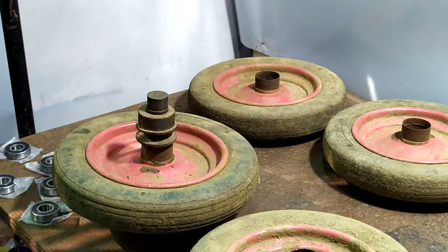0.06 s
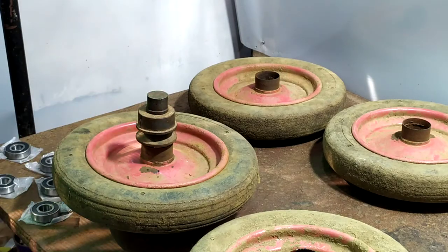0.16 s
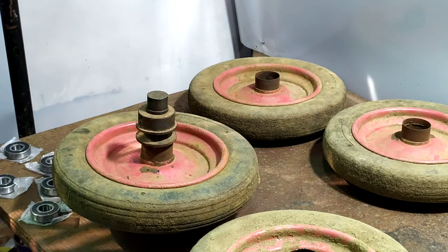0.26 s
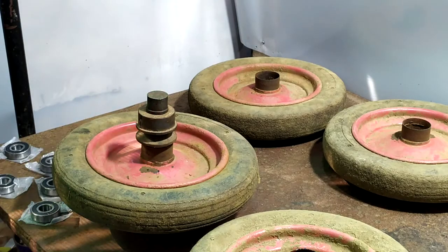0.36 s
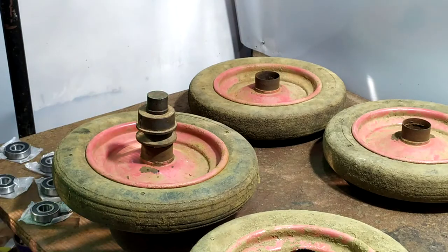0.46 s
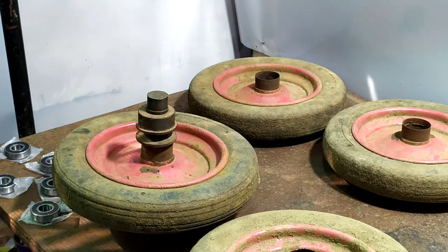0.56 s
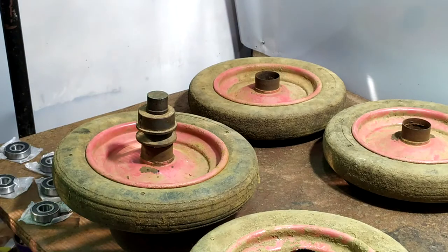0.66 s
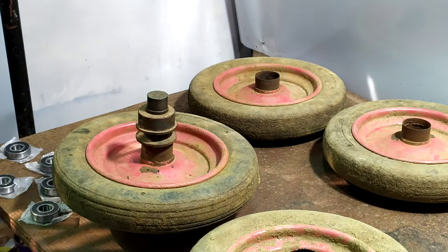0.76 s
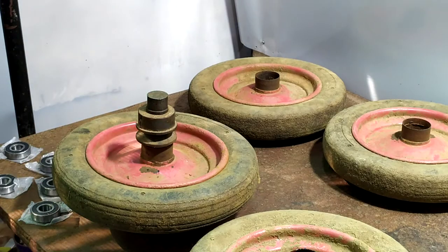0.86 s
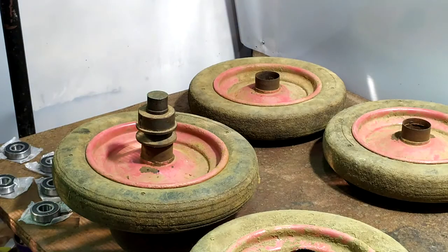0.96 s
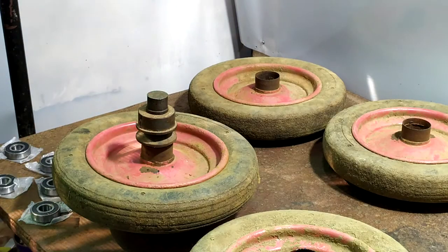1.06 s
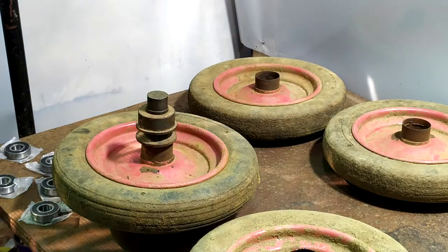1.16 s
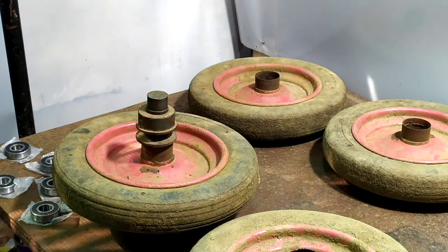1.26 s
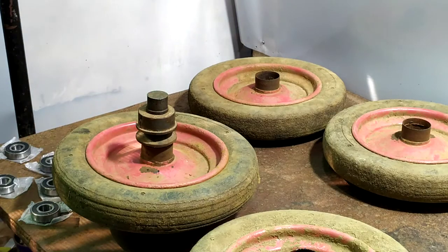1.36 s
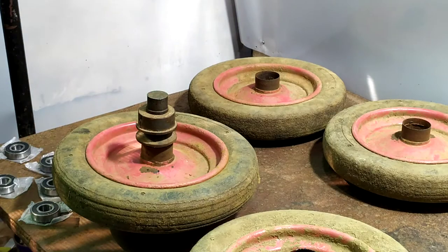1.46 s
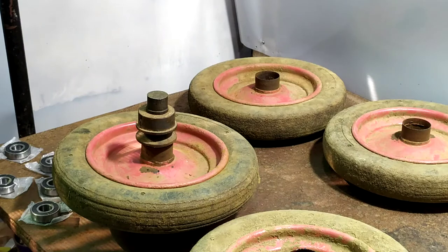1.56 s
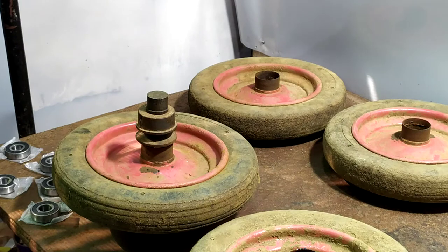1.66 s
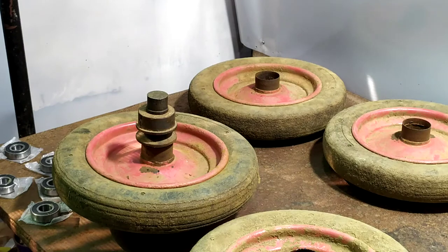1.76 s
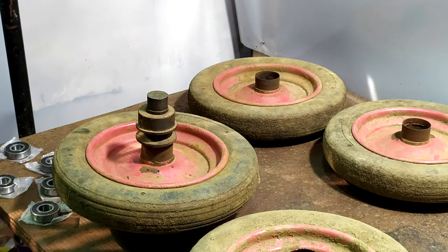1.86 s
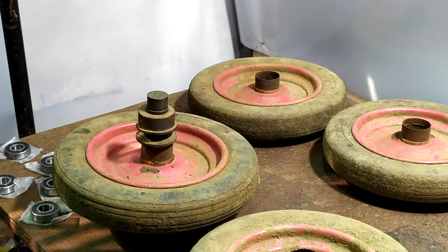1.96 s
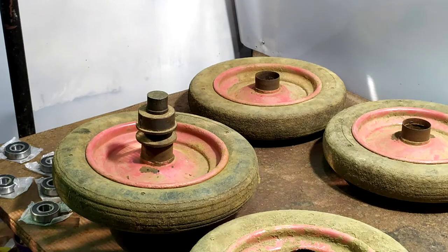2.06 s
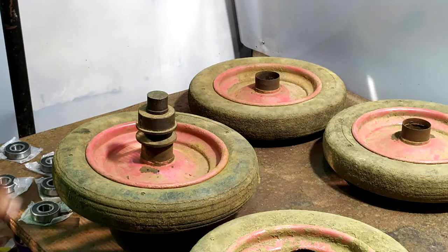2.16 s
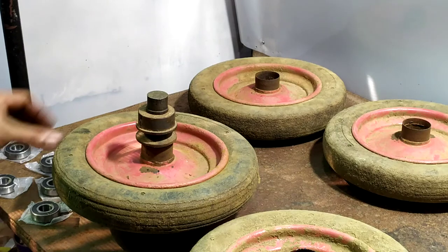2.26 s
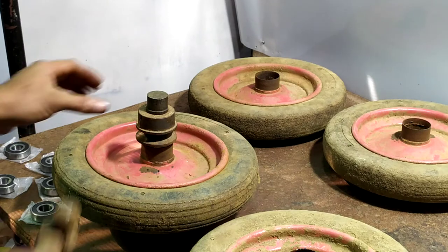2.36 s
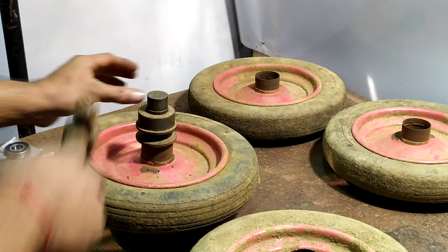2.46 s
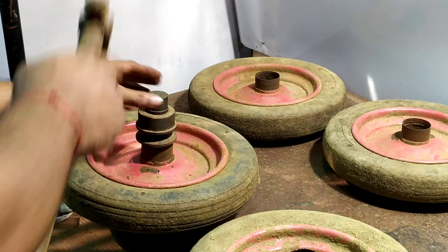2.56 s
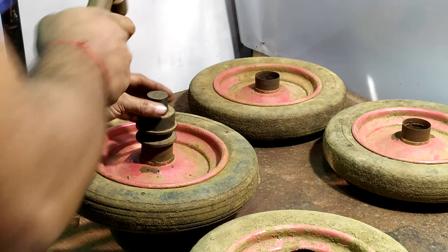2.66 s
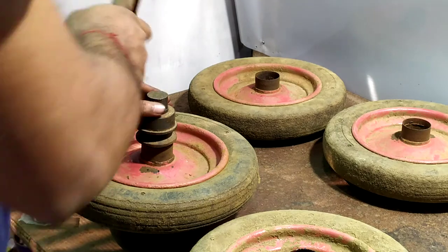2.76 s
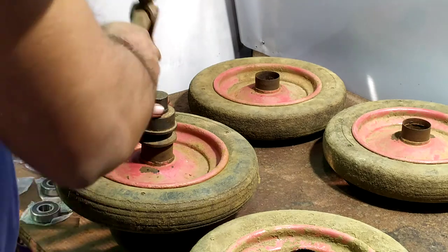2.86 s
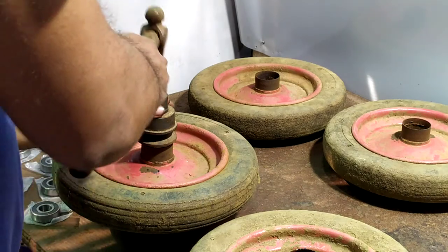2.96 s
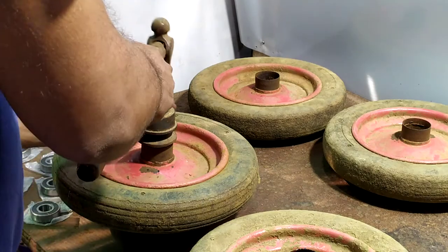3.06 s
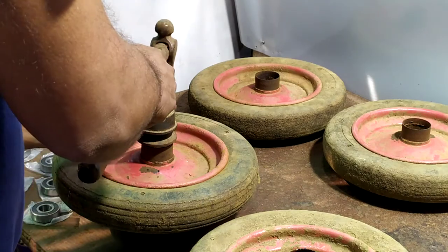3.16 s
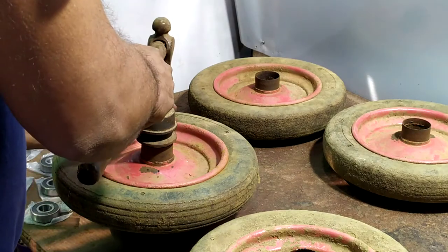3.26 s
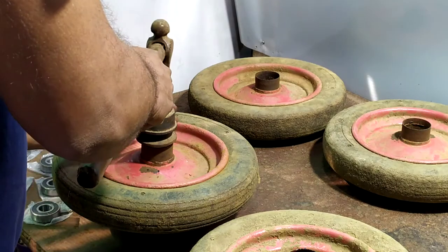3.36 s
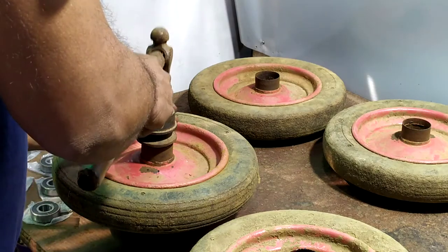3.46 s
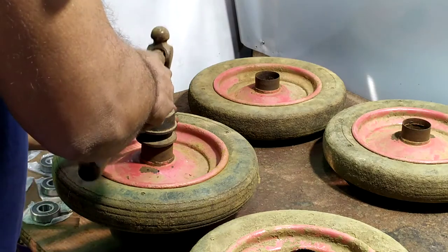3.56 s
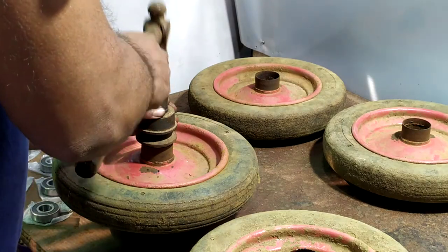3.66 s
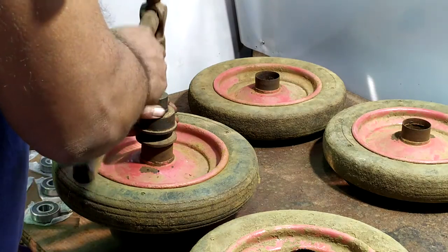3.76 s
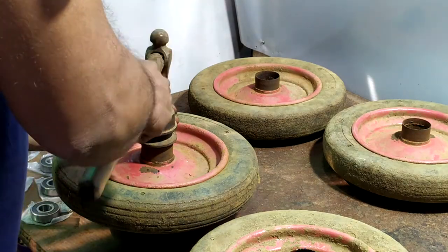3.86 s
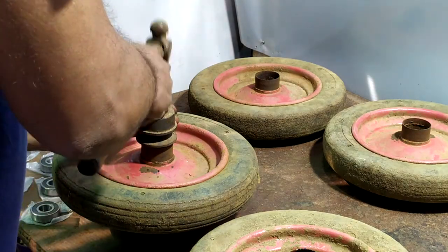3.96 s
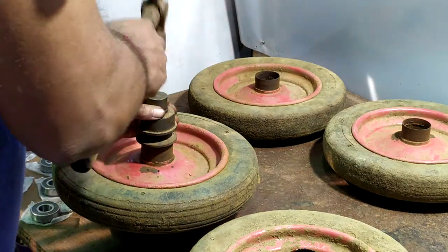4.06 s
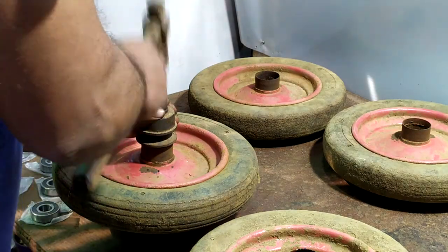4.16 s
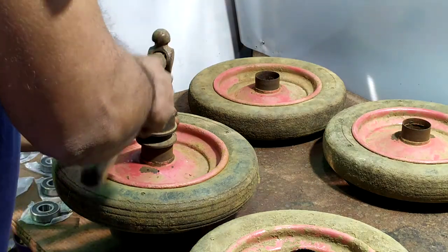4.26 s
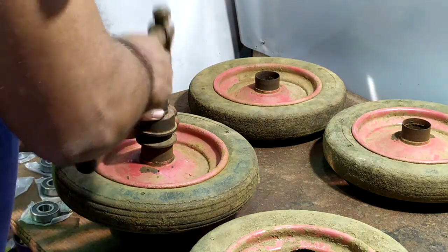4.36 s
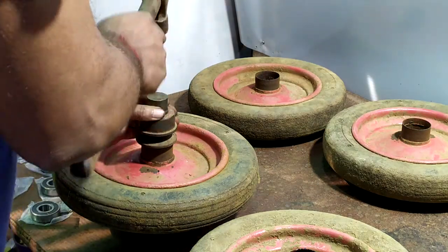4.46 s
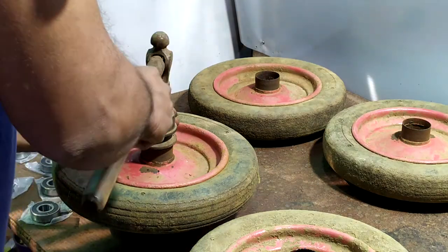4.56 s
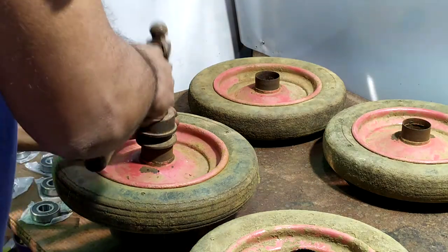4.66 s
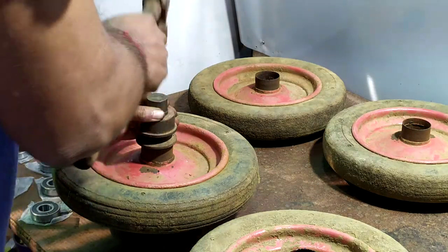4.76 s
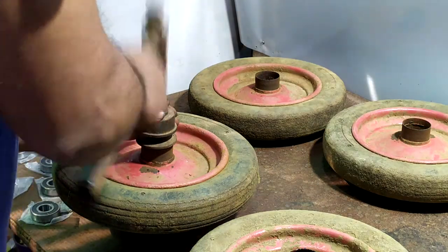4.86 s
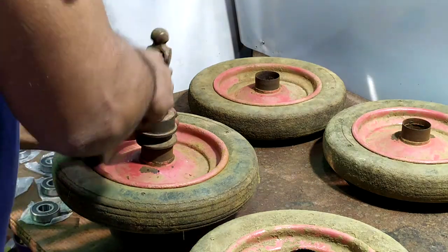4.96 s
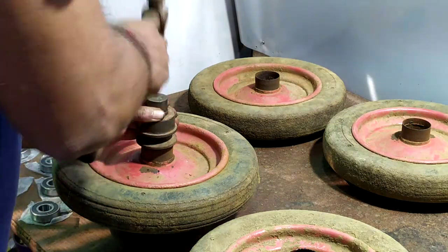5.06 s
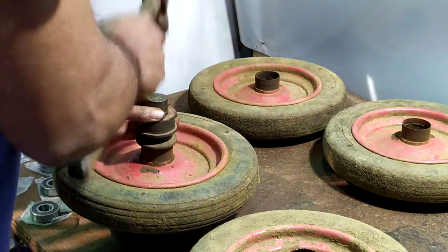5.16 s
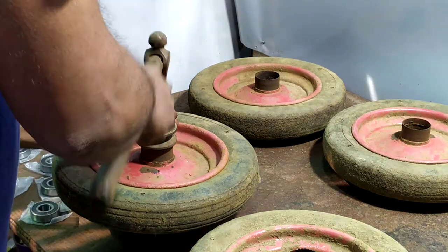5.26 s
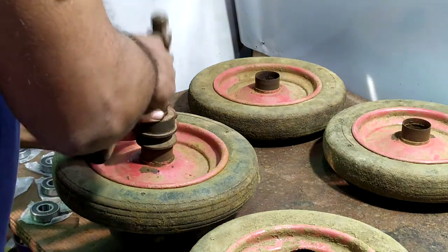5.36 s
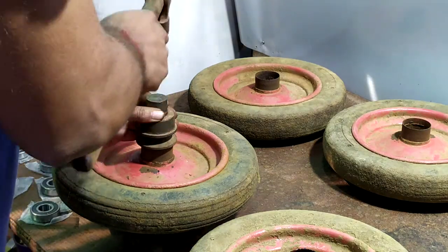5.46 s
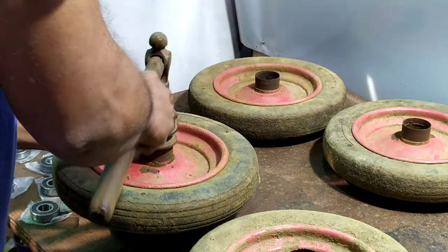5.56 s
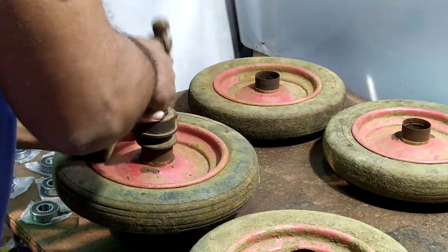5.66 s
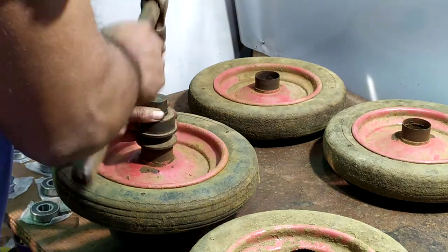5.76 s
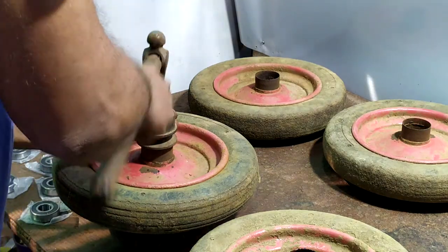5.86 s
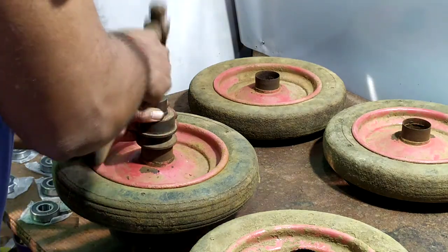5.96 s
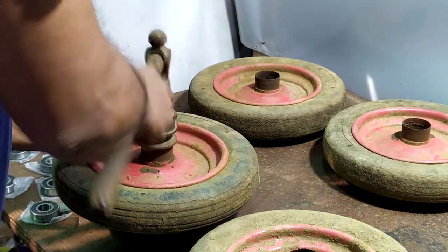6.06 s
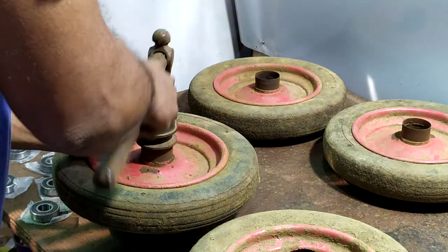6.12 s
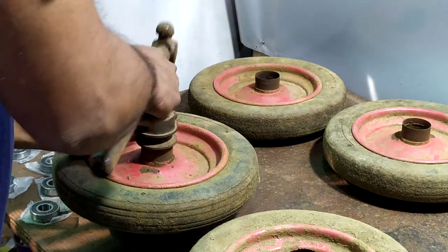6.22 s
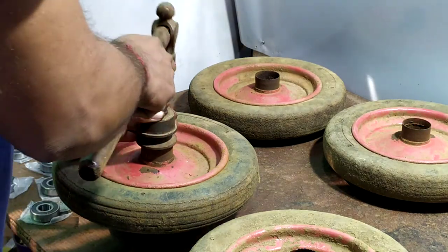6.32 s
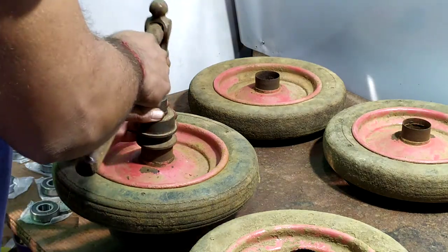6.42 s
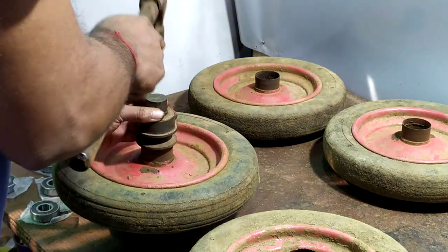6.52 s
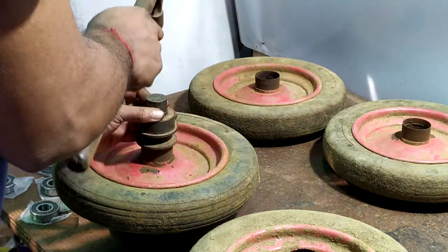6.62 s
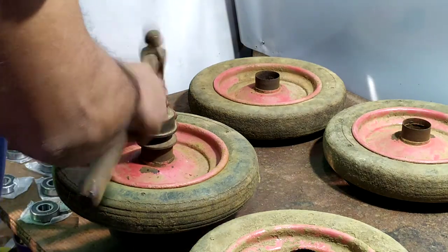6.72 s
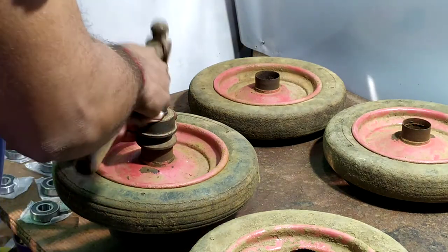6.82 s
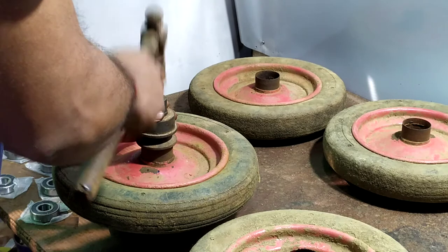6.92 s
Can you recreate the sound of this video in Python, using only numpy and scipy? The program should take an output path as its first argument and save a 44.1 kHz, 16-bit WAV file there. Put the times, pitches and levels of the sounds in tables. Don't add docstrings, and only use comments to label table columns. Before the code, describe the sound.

Quiet shed with faint birds and far rumble, then ten hammer blows on steel, ringing sharp and bright over low wheel and bench boom.

```python
import sys
import numpy as np
from scipy import signal
from scipy.io import wavfile
from scipy.ndimage import uniform_filter1d

SR = 44100
rng = np.random.default_rng(int(sys.argv[2]) if len(sys.argv) > 2 else 0)


def to_wav(sig):
    pcm = np.clip(np.atleast_2d(sig), -1, 1) * 32767
    pcm = np.round(pcm).astype(np.int16)
    wavfile.write(sys.argv[1], SR, pcm.T)


def attenuation_scalar(level_db):
    decades = np.asarray(level_db, float) / 20
    return 10 ** decades


N = 308259


def read(points, hz):
    f, value = np.transpose(points)
    return np.interp(np.log(hz + 1), np.log(f + 1), value)


def evened(x):
    return x / np.sqrt(np.mean(x ** 2) + 1e-20)


def add(mix, s, sound):
    part = mix[:, round(s * SR):][:, :sound.shape[-1]]
    part += sound[..., :part.shape[1]]


def patches(hz, t, frames, bins):
    rough = rng.standard_normal((len(t), len(hz)))
    over_time = uniform_filter1d(rough, frames, axis=0)
    return evened(uniform_filter1d(over_time, bins, axis=1)).T


def pair_noise(field_db, same, size, count):
    frames = 4 * count // size + 5
    hz = np.fft.rfftfreq(size, 1 / SR)[:, None]
    a, b, c, d = rng.standard_normal((frames, len(hz), 4)).T
    like = np.clip(read(same, hz), -1, 1)
    left = a + 1j * b
    right = like * left + np.sqrt(1 - like ** 2) * (c + 1j * d)
    z = np.array([left, right]) * attenuation_scalar(field_db(hz, np.arange(frames) * size / 4 / SR))
    return signal.istft(z, nperseg=size, noverlap=3 * size // 4)[1][:, :count]


def ring(modes, t, rise, scatter_db, apart):
    hz, db, t60 = np.transpose(modes)[:, :, None]
    level, phase, other = rng.standard_normal((3, len(modes), 1))
    size = attenuation_scalar(db + scatter_db * level - 60 * t / t60) * (1 - np.exp(-t / rise))
    angle = 2 * np.pi * hz * t + 3 * phase
    return np.array([(size * np.sin(angle + ear * apart * other)).sum(0) for ear in (0, 1)])


def drift_ring(ring_db, t):
    drift_hz = [8094, 8130, 8182, 8230, 10600, 10670, 10706, 11050, 11750, 13080, 14560, 14840]
    # level/dB, t60/s
    drift_decay = [(4.5, 0.03), (-3, 0.027), (-0.5, 0.029), (-5, 0.082), (-9, 0.04), (-5, 0.066),
                   (-7.5, 0.054), (-16.5, 0.02), (-12, .05), (-1.5, 0.1), (-5, 0.045), (-5, 0.079)]
    grip = .003
    held_hz = drift_hz * (1 + grip * rng.standard_normal(len(drift_decay)))
    modes = [(hz, *decay) for hz, decay in zip(held_hz, drift_decay)]
    return attenuation_scalar(ring_db - 23.5) * ring(modes, t, .0001, scatter_db=2.5, apart=0)


def loose_parts(t):
    clatter_hz = np.geomspace(1500, 15000, num=40) * rng.uniform(1.0, 1.04, size=40)
    modes = [(hz, 0, .03) for hz in clatter_hz]
    return attenuation_scalar(-43.0) * ring(modes, t, 0.000093, scatter_db=3.5, apart=0)


def shed_answer(colour, strength_db, boom_db, clank_db, t):
    # f/Hz, t60/s
    shed_t60 = [(60, 0.2), (160, 0.45), (420, 0.34), (1100, 0.24), (2900, 0.26), (7700, 0.24), (12000, 0.2),
                (15500, 0.23)]
    # f/Hz, left-right likeness [-1..1]
    shed_same = [(60, 1), (250, .9), (500, .7), (1000, 0.12), (4000, -0.14), (8000, -0.14), (15000, -0.16)]
    # f/Hz, width/Hz, level/dB
    hub = [(1020, 160, 9), (1910, 130, 2)]
    tilt_per_clank = 0.06
    patchy_db = 3

    def field(hz, s):
        t60 = read(shed_t60, hz)
        early = attenuation_scalar(-60 * s / t60)
        late = attenuation_scalar(-31 - 3.9 * np.log2(1 + hz / 1000) - 60 * s / (3.4 * t60))
        tilt = tilt_per_clank * (clank_db + 11) * np.log2(np.maximum(hz, 1500) / 4000)
        body = 0.54 * (boom_db + 19) / (1 + (hz / 480) ** 4)
        clank = 0
        for f, width, db in hub:
            peak_db = db + 0.6 * (clank_db + 13) * 1000 / f
            clank = clank + peak_db * np.exp(-((hz - f) / width) ** 2 / 2)
        uneven = patchy_db * patches(hz, s, frames=16, bins=2) * (hz > 2500)
        return read(colour, hz) + tilt + body + clank + uneven + 20 * np.log10(early + late)

    walls = pair_noise(field, shed_same, size=512, count=len(t))
    walls = walls / np.std(walls[:, :900])
    click = .4 * np.exp(-t / 0.00067)
    thud = attenuation_scalar(-.6 * strength_db - 11.5) * np.exp(-(t / 0.0083) ** 2)
    return walls * (1 + click + thud) * np.minimum(t / .0004, 1)


def bench_and_wheel(boom_db, t):
    # f/Hz, level/dB, t60/s
    bench = [(79.5, -28.5, .5), (113.7, -1, 0.32), (140.3, -6, 0.3), (165, -13.5, 0.22), (207, -3.5, 0.32),
             (240.5, -2.5, 0.23), (285.7, 0.5, 0.18)]
    # f/Hz, level/dB, t60/s
    wheel = [(369, -8.5, 0.27), (407.5, -3, 0.26), (424.4, 3.5, 0.13), (439.4, -1.5, 0.27), (484, -8, 0.31),
             (529, -9.5, .28), (558, -14.5, 0.41)]
    low = attenuation_scalar(0.57 * boom_db - 8.0) * ring(bench, t, 0.013, scatter_db=2.0, apart=0.39)
    low += attenuation_scalar(boom_db + 3.0) * ring(wheel, t, 0.0085, scatter_db=2.5, apart=0.26)
    rocking = evened(uniform_filter1d(rng.standard_normal(len(t)), 500))
    return low * attenuation_scalar(2.0 * rocking)


def blow(colour, strength_db, boom_db, clank_db, ring_db):
    t = np.arange(round(.9 * SR)) / SR
    short = t[:8000]
    walls = shed_answer(colour, strength_db, boom_db, clank_db, t)
    drift = drift_ring(ring_db, short)
    steel = loose_parts(short) + drift
    steel[:, 0] = 1
    crack = signal.fftconvolve(walls, steel, axes=1)[:, :len(t)]
    crack[:, :len(short)] += attenuation_scalar(28 + read(colour, 9000)) * drift * [[1], [-.3]]
    low = bench_and_wheel(boom_db, t) * attenuation_scalar([[-1.2], [1.2]])
    return attenuation_scalar(strength_db) * (attenuation_scalar(-6) * crack + low)


def resonate(x, hz, width):
    turn = np.exp(2j * np.pi * np.cumsum(hz * np.ones(len(x))) / SR)
    r = np.exp(-np.pi * width / SR)
    return 2 * (turn * signal.lfilter([1 - r], [1, -r], x / turn + 1e-18)).real


def note(s, length, db, first_hz, last_hz, trilled):
    u = np.array([0, .2, 1])
    depth_hz = trilled * (500 + 4700 * min(length, .15))
    course_db = db + np.array([-6.5, 0, -6.5])
    return s + length * u, course_db, first_hz + (last_hz - first_hz) * u, depth_hz + 0 * u


def bird(s, db, hz, trill, width):
    t = np.arange(s[0], s[-1], 1 / SR)
    db, hz, trill = (np.interp(t, s, course) for course in (db, hz, trill))
    trill_rate = 70 + 20 * rng.standard_normal(len(t))
    path = hz + trill * np.sin(2 * np.pi * np.cumsum(trill_rate) / SR)
    breath = rng.standard_normal(len(t))
    song = evened(resonate(resonate(breath, path, width), path, width))
    song = attenuation_scalar(db - 3.5) * song * signal.windows.tukey(len(t), .1)
    yard = rng.standard_normal((2, 9000)) * attenuation_scalar(-60 * np.arange(9000) / SR / 0.38)
    yard[:, 0] = 20
    return s[0], signal.fftconvolve(song[None], yard / np.linalg.norm(yard[0]), axes=1)


def faint(length, hz, db, width, alike):
    a, b = rng.standard_normal((2, round(length * SR)))
    both = [evened(resonate(x, hz, width)) for x in (a, alike * a + (1 - alike) * b)]
    return attenuation_scalar(db) * np.array(both) * signal.windows.tukey(len(a), .6)


def air():
    # f/Hz, level/dB per Hz
    air_colour = [(15, -46.5), (25, -7.5), (58, -2.5), (87, -1), (285, -14.5), (517, -17), (1190, -25),
                  (5580, -26.5), (6740, -20), (8370, -25), (9580, -25), (13600, -32.5), (16000, -33.5)]
    # f/Hz, left-right likeness [-1..1]
    air_same = [(60, 0.53), (180, 0.27), (550, 0.15), (1650, 0.15), (4970, -0.05), (15000, -0.19)]
    # t/s, level/dB
    traffic = [
        (0, 3),
        (.25, -3),
        (.5, -1.5),
        (1.36, 0),
        (1.65, -1.5),
        (1.87, 5),
        (2.15, -0.5),
        (3.35, -2.5),
        (3.6, -0.5),
        (7, 6),
    ]

    def field(hz, t):
        low = 1 / (1 + (hz / 400) ** 2)
        bustle = np.interp(t, *np.transpose(traffic))
        hiss = 2.7 + .2 * bustle - 0.84 * t
        uneven = 2.0 * patches(hz, t, frames=12, bins=10)
        return read(air_colour, hz) + low * bustle + (1 - low) * hiss + uneven

    return attenuation_scalar(-63.5) * evened(pair_noise(field, air_same, size=1024, count=N))


def scene():
    # t/s, strength/dB, seating boom/dB, hub clank/dB, drift ring/dB
    blows = [
        (3.5547, -24, -18, -31, -8),
        (3.922, -7.5, -25.5, -10, -16),
        (4.2756, -3.5, -24, -3, -17),
        (4.623, -2, -26.5, -11, -21),
        (4.962, -1, -18, -15.5, -13.5),
        (5.302, 1, -17, -12, -21.5),
        (5.617, 1.5, -17, -17.5, -10),
        (5.8968, 2.5, -17.5, -16.5, -16),
        (6.1392, 2, -19.5, -23, -14.5),
        (6.81, 1, -17, -16, -18.5),
    ]
    # f/Hz, level/dB per Hz
    crack_colour = [(40, -30), (100, -15.5), (320, -8), (500, -7.5), (1300, -8.5), (2100, -4.5),
                    (3500, -7.5), (5200, -7.5), (8100, -3), (9400, -6.5), (10800, -1), (13000, -9),
                    (15200, -11.5), (15900, -30.5)]
    # f/Hz, level/dB per Hz
    tap_colour = [(35, -37), (60, -13.5), (262, -14.5), (331, -10), (1140, -14), (2200, -10), (3420, -23),
                  (7230, -5.5), (9570, -17), (11000, -9.5), (12400, -28.5), (13600, -27.5), (16000, -76.5)]
    # t/s, length/s, level/dB, first pitch/Hz, last pitch/Hz
    whistles = [
        (.12, 0.26, -71, 7800, 7230),
        (.98, 0.11, -66, 7160, 7300),
        (1.84, 0.13, -62, 7100, 6670),
        (2.4, 0.045, -67, 7740, 7690),
        (2.48, 0.066, -66, 7650, 7650),
        (2.55, .18, -68.5, 7200, 7100),
        (2.74, .1, -70, 7700, 7400),
        (3.23, .1, -72, 7300, 7200),
        (6.37, 0.048, -72, 7860, 7700),
        (6.44, 0.12, -65, 6830, 6670),
    ]
    # t/s, length/s, level/dB, first pitch/Hz, last pitch/Hz
    chatters = [(0.368, 0.16, -59.5, 6860, 5700), (0.511, 0.12, -55.5, 5660, 5400),
                (.62, 0.092, -57, 5800, 6300), (1.232, 0.057, -52, 6240, 3830),
                (1.263, 0.039, -53, 4020, 5340), (1.298, .05, -47.5, 5750, 8400),
                (1.351, 0.034, -45.5, 7100, 4200), (1.398, .08, -50, 4500, 5570),
                (1.471, 0.14, -62, 5450, 6240), (1.998, 0.25, -62, 5800, 5750),
                (3.444, 0.2, -55, 6500, 5380), (4.8, .09, -50.5, 4630, 5100), (4.89, 0.04, -52, 5550, 6850),
                (6.607, 0.2, -63.5, 5700, 5750)]
    # t/s, pitch/Hz, level/dB, length/s, width/Hz
    drones = [(0.061, 105, -63, 0.41, 3.4), (0.022, 387, -71, 0.37, 14), (0.701, 280, -70.5, 0.12, 100),
              (0.901, 708, -81.5, .36, 8), (1.45, 538, -79, 0.72, 2.2), (1.525, 278, -72.5, 0.2, 42),
              (1.701, 1030, -75, 0.19, 36), (1.82, 165, -59.5, 0.33, 35), (2.2, 532, -80, 0.98, 3.8),
              (2.24, 724, -87, 0.94, 7.4), (2.908, 365.5, -74, 0.23, 8.7), (6.3, 1507, -80.5, 0.49, 11),
              (6.304, 1964, -76.5, 0.39, 26), (6.447, 306.7, -67, 0.19, 26)]
    # t/s, centre/Hz, level/dB, length/s, width/Hz
    rustles = [
        (0, 9000, -72, 0.089, 9000),
        (.73, 5000, -68.5, 0.077, 9000),
        (.97, 6000, -68, .06, 9000),
        (1.773, 10500, -60, 0.11, 3000),
        (1.808, 5000, -68.5, 0.021, 6000),
        (1.969, 2960, -58.5, .06, 5970),
        (2.129, 3000, -69, 0.057, 7000),
        (2.305, 7000, -66, 0.062, 9000),
        (2.808, 6000, -66.5, 0.044, 9000),
    ]
    mix = air()
    for k, (s, *row) in enumerate(blows):
        add(mix, s, blow(crack_colour if k else tap_colour, *row))
    for row in whistles:
        add(mix, *bird(*note(*row, trilled=0), width=210))
    for row in chatters:
        add(mix, *bird(*note(*row, trilled=0.79), width=850))
    for s, hz, db, length, width in drones:
        add(mix, s, faint(length, hz, db, width, alike=0.61))
    for s, hz, db, length, width in rustles:
        add(mix, s, faint(length, hz, db, width, alike=0.615))
    return mix


def top_cut(x):
    return signal.sosfilt(signal.butter(12, 16160, fs=SR, output="sos"), x)


def record(dry):
    top = .7
    capsule = signal.butter(4, 44, "high", fs=SR, output="sos")
    output_stage = signal.butter(2, 35, "high", fs=SR, output="sos")
    x = signal.sosfilt(capsule, dry)
    clipped = top * x / (top ** 6 + np.abs(x) ** 6) ** (1 / 6)
    return top_cut(signal.sosfilt(output_stage, clipped))


dry = scene()
out = record(dry)
to_wav(out)
```